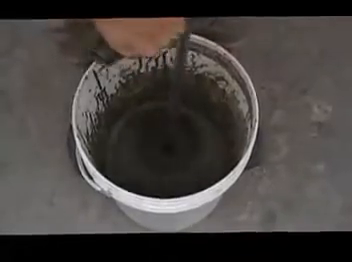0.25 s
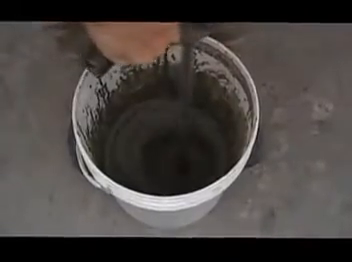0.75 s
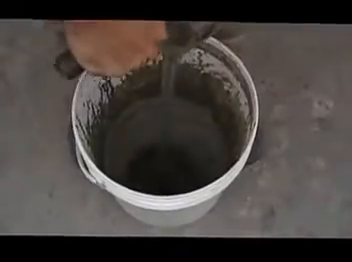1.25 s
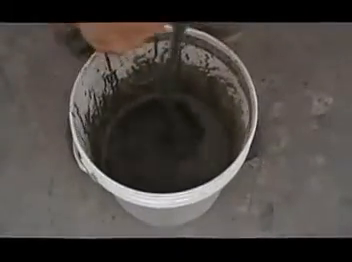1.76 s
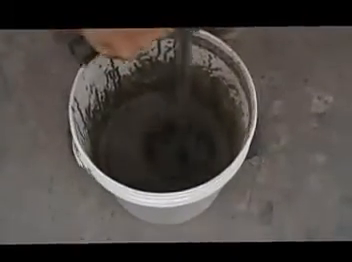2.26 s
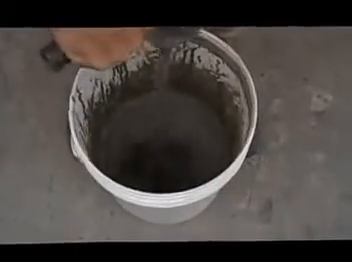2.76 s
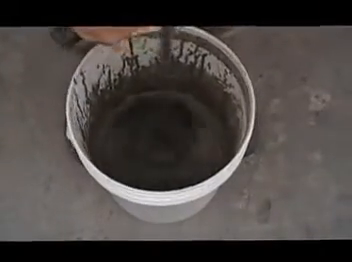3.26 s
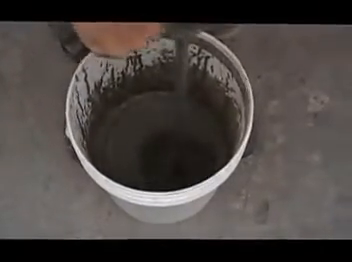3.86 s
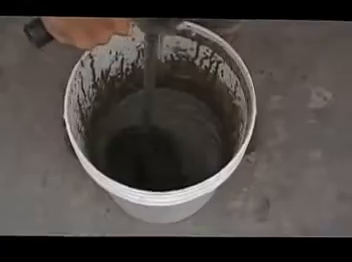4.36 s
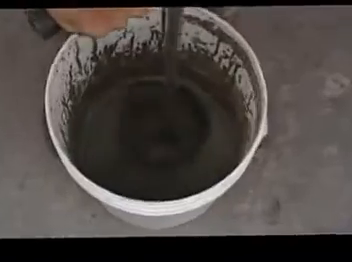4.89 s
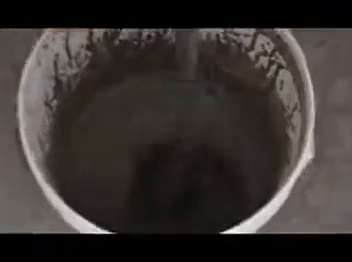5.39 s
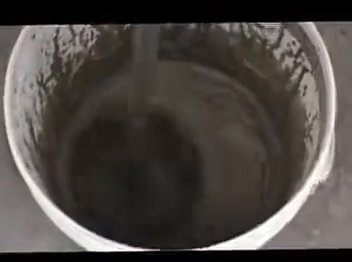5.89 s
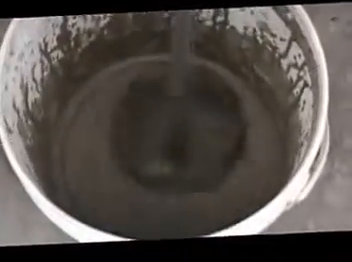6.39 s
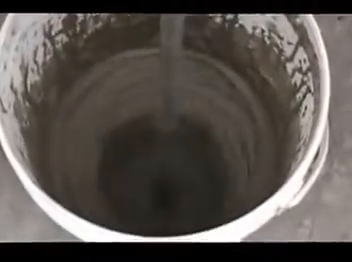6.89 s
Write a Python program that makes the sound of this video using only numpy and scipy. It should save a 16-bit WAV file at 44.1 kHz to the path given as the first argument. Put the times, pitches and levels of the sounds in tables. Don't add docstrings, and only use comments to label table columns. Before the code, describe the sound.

Steady hissing drill whine over thick mortar churning in a plastic bucket, the paddle thudding against the wall in clusters; still running at the end.

```python
import sys
import numpy as np
from scipy import signal
from scipy.fft import rfft, irfft
from scipy.io import wavfile
from scipy.ndimage import uniform_filter1d

SR = 44100
rng = np.random.default_rng(int(sys.argv[2]) if len(sys.argv) > 2 else 0)


def output_pcm(signal):
    pcm = np.clip(np.atleast_2d(signal).T, -1, 1) * 32767
    wavfile.write(sys.argv[1], SR, np.round(pcm).astype(np.int16))


def field_ratio(decibels):
    return 10 ** (np.asarray(decibels, dtype=float) / 20)


N = 314874
T, FRAMES, BINS = np.arange(N) / SR, N // 128 + 5, np.fft.rfftfreq(512, 1 / SR)
FRAME_T = np.arange(FRAMES) * 128 / SR
TRIGGER_S, FULL_SPEED_HZ = .187, 1640
LAYSHAFT, PADDLE = 0.0408, 0.0162


def evened(x):
    return x / np.sqrt(np.mean(x ** 2) + 1e-20)


def read(points, hz):
    f, value = np.transpose(points)
    return np.interp(np.log(hz + 1), np.log(f + 1), value)


def columns(rows, t):
    s, *rest = np.transpose(rows)
    return [np.interp(t, s, c) for c in rest]


def bumps(rows, column):
    return sum(row[column] * np.exp(-((FRAME_T - row[0]) / row[1]) ** 2) for row in rows)


def fine(control):
    return np.interp(T, FRAME_T, control)


def drift(hz):
    r = np.exp(-np.pi * abs(hz) / SR)
    z = rng.standard_normal((N, 2)) @ [1, 1j]
    for _ in range(2):
        z = signal.lfilter([1 - r], [1, -r], z)
    return z / np.sqrt(np.mean(abs(z) ** 2))


def tone(turns, steady, flutter, blur_hz):
    height = steady + flutter * drift(blur_hz)
    return np.sqrt(2) * (height * np.exp(2j * np.pi * turns)).real


# pitch_hz, likeness (0 to 1)
CAPSULE_LIKENESS = [(60, .3), (130, .99), (290, .9), (640, .87), (1410, .95), (2500, .88), (4500, .94),
                    (6500, .955), (9000, .76), (11500, .68), (13500, .35)]


def noise(shape_db, patchy_db):
    a, b, c, d, patches = rng.standard_normal((FRAMES, 257, 5)).T
    patches = uniform_filter1d(patches, size=8, axis=0)
    patches = evened(uniform_filter1d(patches, size=20, axis=1))
    same = np.clip(read(CAPSULE_LIKENESS, BINS), 0, 1)[:, None]
    mid = a + 1j * b
    odd = np.sqrt((1 - same) / (1 + same)) * (c + 1j * d)
    gain = field_ratio(shape_db + patchy_db * patches)
    gain = gain / np.sqrt((gain ** 2).mean(0))
    out = signal.istft(np.array([mid + odd, mid - odd]) * gain, nperseg=512, noverlap=384)[1][:, :N]
    return out / np.sqrt(np.mean(out.mean(0) ** 2))


# time_s, tone_unit_hz (a third of the armature slot rate)
CRUISING_SPEED = [(.19, 1548), (.28, 1570), (.38, 1540), (.65, 1536), (1.0, 1556), (1.74, 1587),
                  (1.9, 1613), (2.3, 1620), (2.75, 1608), (3.2, 1621), (3.36, 1632), (4.0, 1624),
                  (4.5, 1634), (5.1, 1652), (5.5, 1640), (6.3, 1646), (6.55, 1656), (6.85, 1660)]
# time_s, half_width_s, speed_lost_hz
BOGS = [
    (4.6, .08, 14),
    (4.75, .05, 5),
    (6.1, .085, 15),
    (6.44, .05, 9),
    (7.16, .14, 9),
]


def motor_speed():
    start_hz, coast_decay_s, spin_up_s = 860.5, .73, .22
    coast = start_hz * np.exp(-np.minimum(FRAME_T, TRIGGER_S) / coast_decay_s)
    lag = np.exp(-np.maximum(FRAME_T - TRIGGER_S, 0) / spin_up_s)
    driven = columns(CRUISING_SPEED, FRAME_T)[0] - (CRUISING_SPEED[0][1] - coast) * lag
    return np.where(FRAME_T < TRIGGER_S, coast, driven) - bumps(BOGS, column=2)


def speed_share(turns):
    return np.gradient(turns) * SR / FULL_SPEED_HZ


def snags():
    brake = 0
    for s, db, hz in KNOCKS:
        after = np.maximum(FRAME_T - s, 0)
        grab = (1 - np.exp(-after / 0.0035)) * np.exp(-after / 0.055)
        brake = brake + field_ratio(1.3 * (db + 21.0)) * grab
    return .0045 * fine(brake - uniform_filter1d(brake, size=70))


def nearness():
    start_s, rise_s = 4.65, 0.9
    return np.clip((FRAME_T - start_s) / rise_s, 0, 1)


WALL_PASSES = [-1.4, .1, 1.64, 3.08, 4.55, 6.1, 7.7]


def lap(share):
    laps = np.interp(FRAME_T, WALL_PASSES, np.arange(len(WALL_PASSES)))
    return np.cos(2 * np.pi * (laps - share))


# time_s, hiss_change_db
VENT_JOLTS = [(1.63, -4), (2.9, -3), (4.1, 3), (4.34, -2), (4.41, 5), (4.45, -6), (4.53, 2.5), (4.69, -8),
              (5.97, 1.5), (6.01, -5), (6.12, -2.5), (6.18, -2.5), (6.44, -1)]
# time_s, half_width_s, churn_db
SLACKS = [(.17, .035, -2), (.5, .2, -5), (.776, .035, -9), (1.16, 0.036, -1), (2.0, 0.037, -6),
          (2.52, 0.036, 0), (3.06, 0.026, -5), (3.61, 0.018, -6), (3.71, 0.023, -7), (4.47, .03, -6),
          (4.6, 0.035, -3), (4.96, .05, -7), (5.865, 0.018, -2), (6.054, .035, 0), (6.173, 0.018, -6),
          (7.1, .4, -5)]


def loads():
    near, run_db = nearness(), 20 * np.log10(motor_speed() / FULL_SPEED_HZ)
    jolt_s, splash_s, splash_gain_db = 0.0066, 0.016, 1
    jolt_db = bumps([(s, jolt_s, db) for s, db in VENT_JOLTS], column=2)
    splashes = [(s, splash_s, splash_gain_db * field_ratio(db + 19.5)) for s, db, hz in KNOCKS]
    start_db = -7 * np.exp(-FRAME_T / 0.14)
    hiss_db = -16.33 + 0.84 * near + jolt_db
    growl_db = -26.62 - near + start_db
    churn_db = -41.5 + 5.5 * lap(0.0094) * (1 - .5 * near)
    churn_db += 1.2 * near * (FRAME_T < WALL_PASSES[-2]) + 3.04 * run_db
    churn_db += bumps(splashes, column=2) + bumps(SLACKS, column=2) - 2.4 * start_db
    return fine(hiss_db), fine(growl_db), fine(churn_db)


# time_s, half_width_s, level_db
BITES = [(1.056, 0.035, 4.0), (1.505, 0.04, 3), (1.547, 0.012, 5.5), (1.703, 0.023, 8), (1.785, 0.02, 8),
         (2.097, 0.03, 2), (2.348, 0.04, 3.5), (2.716, 0.03, 2.5), (2.936, 0.023, 5), (3.167, 0.027, 5),
         (3.244, 0.028, 5.0), (3.34, 0.019, 8), (3.441, 0.035, 7), (3.639, 0.026, 6.0), (3.966, 0.04, 2),
         (4.187, 0.04, 3), (4.486, 0.04, 3.5), (4.589, 0.018, 5.0), (4.736, 0.034, 6), (4.891, 0.035, 4),
         (5.17, 0.022, 4), (5.432, 0.03, 4), (6.056, 0.023, 4), (6.218, 0.04, 4.0), (6.667, 0.04, 4.0),
         (6.931, 0.033, 5.0), (7.067, 0.017, 2)]
# time_s, level_db
SKIPS = [(1.417, -2), (1.582, -6), (1.675, -3), (1.739, -11), (1.814, -9), (2.187, -7), (2.877, -3),
         (3.104, -2), (3.195, -7), (3.277, -10), (3.889, -7), (4.294, -7), (4.691, -11), (6.084, -7),
         (6.744, -5)]


def bites():
    skip_s = 0.011
    return bumps(BITES, column=2) + bumps([(s, skip_s, db) for s, db in SKIPS], column=2)


def scrape():
    centre_hz, half_width_hz = 1700, 129
    return np.outer(np.exp(-((BINS - centre_hz) / half_width_hz) ** 2), 0.55 * bites())


# pitch_hz, level_db (per Hz)
HISS_COASTING = [(800, -70), (1200, -19), (1550, -4), (2310, -7.5), (2800, -3.5), (3400, -13), (4020, -13),
                 (5000, -7), (6040, -1.5), (7570, -4), (8350, 3.5), (9200, -3.5), (12000, -19.5),
                 (16000, -50)]
# pitch_hz, level_db (per Hz)
HISS_AT_SPEED = [(800, -32.5), (1200, -18), (1350, -11), (1730, -5), (2100, -9), (3180, -6.5), (4000, -7),
                 (6040, -3), (8150, -2.5), (9470, -3), (10500, -8), (12500, -21), (14000, -26),
                 (16000, -66)]
# pitch_hz, half_width_hz, level_db
HOUSING = [(2780, 140, 1.5), (3410, 91, -4), (4060, 200, 2.5), (6100, 200, 1.5), (7800, 100, 2.5),
           (8360, 120, 3.5), (10440, 170, -3), (10520, 60, 0.5)]


def hiss(turns, level_db):
    fast = np.clip((motor_speed() - 850) / 650 + 0.4 * (FRAME_T > TRIGGER_S), 0, 1)
    colour_db = np.outer(read(HISS_COASTING, BINS), 1 - fast) + np.outer(read(HISS_AT_SPEED, BINS), fast)
    ring_db = sum(db * np.exp(-((BINS - hz) / width) ** 2) for hz, width, db in HOUSING)
    colour_db += np.outer(ring_db, fast) + scrape()
    air = np.clip((BINS - 11000) / 3000, 0, 1)
    colour_db += np.outer(air, 5.5 * np.interp(FRAME_T, T, drift(hz=25).real))
    gusts_db = 0.098 * drift(hz=20.8).real + 1.07 * drift(hz=91.0).real
    gusts_db += 0.75 * np.cos(2 * np.pi * LAYSHAFT * turns)
    return field_ratio(level_db + gusts_db) * noise(colour_db, patchy_db=0.5)


# pitch_hz, level_db (per Hz)
GROWL_FAR = [(220, -32), (380, -3), (447, -28.5), (561, -3.5), (699, -5), (1120, 4), (1470, -7), (1710, -1),
             (2200, -2), (2860, -14.5), (4840, -120)]
# pitch_hz, level_db (per Hz)
GROWL_NEAR = [(220, -40), (380, -21.5), (467, -15.5), (704, -9.5), (816, 0.5), (1320, -7.5), (1730, -3),
              (2040, -21), (2200, -19), (2860, -26), (4840, -120)]


def growl(turns, level_db):
    near = nearness()
    colour_db = np.outer(read(GROWL_FAR, BINS), 1 - near) + np.outer(read(GROWL_NEAR, BINS), near) + scrape()
    throb_db = 0.17 * drift(hz=37).real + 0.32 * np.cos(2 * np.pi * LAYSHAFT * turns)
    return field_ratio(level_db + throb_db) * noise(colour_db, patchy_db=1.06)


# pitch_hz, level_db (per Hz)
CHURN_COLOUR = [(12, -72), (20, -42), (75, -41), (101, -26), (189, -26), (216, -5), (255, -2.5), (274, 16),
                (468, -26), (528, -1), (700, -4), (910, -25), (1540, -120)]


def churn(turns, level_db):
    slap_db = 1.5 * np.cos(2 * np.pi * PADDLE * turns) + 2.5 * drift(hz=30).real
    wash = noise(read(CHURN_COLOUR, BINS)[:, None], patchy_db=1.0)
    thin = signal.butter(3, 150, "high", fs=SR, output="sos")
    return field_ratio(level_db - 0.5 + slap_db) * signal.sosfilt(thin, wash)


def wall_note(level_db):
    return field_ratio(level_db - 5) * tone(264 * T, steady=0, flutter=0.96, blur_hz=45)


# pitch_hz, level_db
SLOT = [(2000, -48), (3300, -33), (3550, -31), (3750, -25), (3900, -29), (4100, -23), (4260, -29),
        (4440, -30), (4570, -24), (4700, -27)]
# pitch_hz, level_db
SLOT_OCTAVE = [(3900, -42), (4300, -40), (4600, -45), (5100, -35), (5400, -41), (7600, -24), (8400, -21),
               (8600, -28), (8750, -19), (8950, -35), (9150, -19), (9400, -25)]
# time_s, half_width_s, slot_db, slot_octave_db, mesh_octave_db
TILTS = [(.6, .02, -12, 3, 0), (.67, .04, -3, 1, 4), (.77, .03, -14, 0, -5), (.89, .05, 2.5, 2, -5),
         (1.07, 0.034, 3.5, 2, 0), (1.7, .07, 3.5, -4, -2), (2.36, 0.065, -2, -1, 6),
         (3.12, 0.022, -0.5, -6, -4), (3.81, .025, 0, -4, 0), (4.62, 0.081, 1, 1, 2),
         (5.29, 0.045, 3, -4, -2), (5.9, .04, 1.5, 2, 9), (6.36, 0.043, 1, 0, 7), (7.14, .04, 2, -8, 2),
         (.99, 0.033, -16, 0.5, -10), (1.3, 0.34, -0.5, 0.5, 2), (4.511, 0.0066, -14, -6, 0),
         (6.03, 0.066, -7, 6, -6), (6.22, 0.047, -5, 6, 0), (2.2, .45, 0.5, 2.5, -16),
         (2.62, 0.065, 2.5, 1, -9), (2.92, 0.16, 0.5, 6.5, -12), (3.32, 0.14, -0.5, 3.5, 0),
         (3.55, 0.36, -0.5, 3, 3), (4.16, 0.091, 2, 3, 3), (4.46, 0.18, -1, 6, -1),
         (4.79, 0.054, -7, 0, -6), (4.95, 0.12, 0, 6.5, 4), (5.52, 0.22, -7, 0, 0), (5.75, 0.17, 0, 4.5, 0),
         (6.16, 0.11, -3, -3, -11), (6.4, 0.1, 0, -4, -1), (6.7, .1, -3, -4, 4), (7.0, 0.15, -2.5, 1.5, 4)]
# time_s, half_width_s, level_db
JERKS = [(3.935, .008, -9), (5.14, .005, -5), (5.265, .01, -6), (5.346, .014, -8), (5.376, .006, -5),
         (5.917, .007, -6), (5.97, 0.027, 3), (6.007, 0.0074, -9), (6.021, .005, 10), (6.12, .045, 1),
         (6.887, .015, -4)]


def armature(turns):
    unit_hz = motor_speed()
    slot_db = read(SLOT, 3 * unit_hz) + 8 * np.clip((unit_hz - 1570) / 35, 0, 1)
    slot_db = fine(slot_db + bumps(TILTS, column=2) + bumps(JERKS, column=2))
    unpowered_db = 6 * (FRAME_T < TRIGGER_S)
    octave_db = fine(read(SLOT_OCTAVE, 6 * unit_hz) + bumps(TILTS, column=3) + unpowered_db)
    settled = np.clip(T - 3.5, 0, 1)
    third_db = -50.5 + 3 * settled + 200 * np.log10(speed_share(turns)) + 5.5 * drift(hz=14).real
    out = field_ratio(slot_db) * tone(3 * turns, steady=.97, flutter=.16, blur_hz=45)
    out += field_ratio(octave_db) * tone(6 * turns, steady=0.88, flutter=0.28, blur_hz=60)
    return out + field_ratio(third_db) * tone(9 * turns, steady=0.8, flutter=.3, blur_hz=60)


def layshaft_wobble(turns):
    return 1 + 0.47 * speed_share(turns) ** 4 * np.cos(2 * np.pi * (LAYSHAFT * turns + 0.25))


# pitch_hz, level_db
MESH_ONE = [(1330, -49), (1450, -23.5), (1720, -21.5), (2260, -22.5), (2550, -19.5), (2930, -25.5),
            (3110, -35), (3190, -44.5)]
# pitch_hz, level_db
MESH_OCTAVE = [(2660, -20), (2930, -25), (3150, -39), (3500, -40), (4620, -38), (4800, -21), (5000, -29),
               (5250, -26), (5400, -35), (5650, -32), (5830, -24), (6100, -31)]
# time_s, half_width_s, mesh_db
FLARES = [(.17, 0.055, -14), (.26, .04, 1), (.8, 0.046, 3), (1.15, .12, 4.5), (1.85, 0.091, -3),
          (2.13, 0.21, 16.5), (3.2, 0.092, 7), (3.6, 0.36, 14.5), (4.65, 0.22, 8), (4.8, .04, 3),
          (4.97, .03, 8), (5.12, 0.29, 16), (5.05, .025, -1), (5.2, .025, -1), (6.18, 0.007, 22),
          (6.25, 0.013, 6), (6.5, 0.35, 10)]
# time_s, peak_db
TOOTH_SLAPS = [(0.1894, 2), (1.07, -4), (1.13, -8), (1.27, -5), (1.3344, -6), (1.3514, 0), (1.4141, 4),
               (1.4887, 12.5), (1.5113, -1), (1.53, -2), (1.553, -2), (1.5814, 11), (1.6135, 7),
               (1.6494, 6), (1.692, 12), (1.7054, -8), (1.7354, 13), (1.7614, 0), (1.778, -2),
               (3.0194, 11.5), (3.0498, 0), (3.195, -7), (4.523, 4), (4.559, 13), (4.5776, 6), (4.6114, -7),
               (4.6324, 1), (4.714, -2), (5.9984, 6), (6.1794, -2.5), (6.494, -17), (6.5281, 7),
               (6.6405, 11)]


def first_gear_pair(turns):
    unit_hz, wobble = motor_speed(), layshaft_wobble(turns)
    loaded = fine(np.clip((unit_hz - 1540) / 60, 0, 1))
    mesh_db = fine(read(MESH_ONE, 2 * unit_hz) + bumps(FLARES, column=2))
    octave_db = fine(read(MESH_OCTAVE, 4 * unit_hz) + bumps(TILTS, column=4) + 3 * nearness())
    octave_db += 10 * np.clip((.14 - T) / .06, 0, 1)
    slaps = fine(bumps([(s + .004, 0.0029, field_ratio(db - 21.0)) for s, db in TOOTH_SLAPS], column=2))
    mesh = tone(2 * turns, steady=.85, flutter=.25 + .4 * loaded, blur_hz=60)
    octave = tone(4 * turns, steady=.88, flutter=.2 + .3 * loaded, blur_hz=90)
    out = (field_ratio(mesh_db) * wobble + .12 * slaps) * mesh
    out += field_ratio(octave_db - 1.5) * wobble * octave
    return out + slaps * tone(4 * turns, steady=.6, flutter=.6, blur_hz=350)


# pitch_hz, level_db
MESH_TWO = [(900, -45), (1340, -42), (1400, -30), (1500, -41.5), (1540, -35), (1630, -32), (1700, -37),
            (1730, -34)]
# time_s, half_width_s, second_mesh_db, case_hum_db
LEANS = [(.58, 0.034, 11, -6), (1.0, 0.15, 2, 3), (1.15, 0.071, -2, 3), (1.47, .07, -4, 6),
         (1.95, 0.17, -6, -5), (2.37, 0.055, -1.5, 0), (3.3, 0.21, 1, 4), (3.8, 0.19, -2.5, 0),
         (4.3, 0.22, -2.5, 0), (5.45, 0.13, 0, 6), (5.82, 0.067, 1, 0), (5.98, 0.077, 1, -2),
         (6.12, 0.052, -11, -4), (6.23, 0.043, 1, 5), (6.4, .08, 5.5, 5), (1.5, .07, 5, 4),
         (1.71, 0.027, 1, -4), (1.79, 0.025, 5, 0), (2.6, .25, 1.5, 5), (7.0, 0.2, -6.5, 0)]


def second_gear_pair(turns):
    unit_hz = motor_speed()
    loaded = np.clip((unit_hz - 1540) / 60, 0, 1)
    level_db = 2.5 + read(MESH_TWO, 1.065 * unit_hz) + 3 * loaded * lap(.65) - 1.2 * nearness()
    level_db = fine(level_db + bumps(LEANS, column=2) + 0.9 * bites())
    return field_ratio(level_db) * layshaft_wobble(turns) * tone(1.065 * turns, steady=.97, flutter=.15, blur_hz=30)


# multiple (of the tone unit), level_db, blur_hz
WEAK_WHINES = [(.75, -61, 15), (1.422, -41.5, 47), (1.644, -43, 20), (2.355, -39, 62), (4.5, -76, 20),
               (6.5, -72, 20)]


def weak_whines(turns):
    whines = sum(field_ratio(db) * tone(k * turns, 0.45, 0.71, blur_hz) for k, db, blur_hz in WEAK_WHINES)
    return speed_share(turns) * whines


# pitch_hz, level_db
CASE_UPPER = [(600, -60), (907, -48), (1077, -40), (1123, -40), (1150, -44), (1175, -48)]


def case(turns):
    unit_hz = motor_speed()
    upper_db = fine(read(CASE_UPPER, .711 * unit_hz) + bumps(LEANS, column=3))
    lower_db = fine(-47.5 + 36 * np.log10(unit_hz / FULL_SPEED_HZ) + 12 * np.minimum(nearness(), .6))
    upper = field_ratio(upper_db) * tone(.711 * turns, steady=.92, flutter=.25, blur_hz=25)
    return upper + field_ratio(lower_db) * tone(.5 * turns, steady=.85, flutter=.45, blur_hz=30)


# time_s, pitch_hz, level_db
SQUEAL = [(0, 11600, -40), (.2, 11550, -37), (.55, 11900, -37), (1.5, 12000, -37), (3, 12020, -39),
          (7.14, 12030, -41)]


def bearing():
    hz, db = columns(SQUEAL, T)
    return field_ratio(db) * tone(np.cumsum(hz) / SR, steady=.1, flutter=1.0, blur_hz=160)


# time_s, peak_db, bucket_ring_hz
KNOCKS = [(.09, -30, 270), (.268, -35, 350), (.715, -28, 300), (1.105, -33, 433), (1.346, -28, 315),
          (1.437, -26, 302), (1.543, -21.5, 257), (1.618, -20.5, 287), (1.657, -24.5, 277),
          (1.71, -23.5, 199), (1.821, -30, 286), (1.95, -35, 272), (2.457, -31, 272), (2.576, -28, 273),
          (2.631, -25, 285), (2.689, -34, 272), (2.779, -31, 278), (2.85, -22.5, 280), (2.93, -27, 254),
          (3.099, -32, 277), (3.152, -28, 307), (3.175, -24, 239), (3.357, -27.5, 350), (3.396, -22.5, 280),
          (3.532, -28, 343), (3.626, -28, 330), (3.733, -27, 260), (4.042, -28, 267), (4.245, -34, 270),
          (4.326, -28, 287), (4.356, -30, 271), (4.397, -29, 285), (4.418, -27, 260), (4.515, -23, 310),
          (4.45, -31, 280), (4.66, -23.5, 281), (4.682, -34, 263), (4.717, -36, 260), (4.755, -27, 260),
          (4.843, -24.5, 255), (5.105, -33, 270), (5.176, -28, 275), (5.397, -29, 270), (5.674, -33, 300),
          (5.78, -27, 257), (5.821, -27, 248), (5.898, -23, 288), (5.929, -28, 279.6), (5.991, -19, 256),
          (6.119, -21, 266), (6.212, -23, 263), (6.246, -27, 273.8), (6.279, -30, 253.4), (6.345, -25, 308),
          (6.39, -27, 312.3)]


def knocks():
    out, t = np.zeros(N + 3000), np.arange(3000) / SR
    thud = signal.sosfilt(signal.butter(2, [205, 800], "band", fs=SR, output="sos"), np.exp(-t / 0.000083))
    thud = thud / abs(thud).max()
    envelope = (1 - np.exp(-t / 0.0025)) * field_ratio(-60 * t / 0.075)
    for s, db, hz in KNOCKS:
        ring = np.sin(2 * np.pi * hz * t) * envelope
        out[round((s + .002) * SR):][:3000] += field_ratio(db - .5) * (ring + 1.4 * thud)
    return out[:N]


# time_s, half_width_s, level_db
SLAB_PRESSES = [
    (.1, .08, 13),
    (1.25, .3, 7),
    (2.4, 0.17, 11),
    (3.1, .2, 7),
    (3.88, 0.14, 12),
    (4.33, .1, 17),
    (5.4, 0.22, 14.5),
    (5.95, 0.17, 6),
    (6.75, .1, 17),
]


def floor_hum():
    level_db = -69.5 + fine(bumps(SLAB_PRESSES, column=2))
    return field_ratio(level_db) * tone(109 * T, steady=0.67, flutter=0.47, blur_hz=9.1)


def lumps():
    per_s, base_db = 8, -33
    draw, size = rng.random(N), np.minimum(rng.exponential(1, N), 3)
    wall = signal.butter(2, [450, 1100], "band", fs=SR, output="sos")
    tick = signal.sosfilt(wall, np.exp(-np.arange(600) / 6))
    level_db = base_db + 3 * size + 4 * fine(lap(0)) - 12 * (T < .9)
    hits = (draw < per_s / SR) * field_ratio(level_db)
    return signal.oaconvolve(hits, tick / abs(tick).max())[:N]


# time_s, peak_db, wall_hz
GRIT_TICKS = [(1.044, -19.5, 647), (1.107, -22, 786), (1.227, -20, 880), (1.346, -21, 720),
              (1.481, -15.5, 884), (1.54, -26, 861), (1.708, -23, 567), (1.784, -21, 890),
              (2.351, -26, 538), (2.741, -36, 835), (2.997, -20, 821), (3.723, -27, 813), (3.834, -22, 633),
              (4.023, -19, 649), (4.128, -26, 640), (4.326, -23, 810), (4.517, -23, 888), (5.552, -26, 783),
              (5.897, -22, 818), (6.109, -17, 846), (6.547, -23, 810), (6.797, -26, 869)]


def ticks():
    out, t = np.zeros(N + 900), np.arange(900) / SR
    attack = 1 - np.exp(-t / 0.00053)
    for s, db, hz in GRIT_TICKS:
        fade = field_ratio(db - 4.5 - 60 * t / 0.032)
        out[round(s * SR):][:900] += 2.1 * fade * attack * np.sin(2 * np.pi * hz * t)
    return out[:N]


def scene():
    hiss_db, growl_db, churn_db = loads()
    shaft_hz, drag_s = 12.8, 3.105
    rod_drag = np.cos(2 * np.pi * shaft_hz * (T - drag_s))
    shiver = .0018 * field_ratio(.6 * (churn_db + 33)) * (.7 * drift(hz=45).real - 1.2 * rod_drag)
    turns = np.cumsum(fine(motor_speed()) * (1 + shiver - snags())) / SR
    wash = hiss(turns, hiss_db) + growl(turns, growl_db) + churn(turns, churn_db)
    surge = field_ratio(.75 * drift(hz=14).real)
    whine = armature(turns) + first_gear_pair(turns) + second_gear_pair(turns) + weak_whines(turns)
    hums = case(turns) + bearing() + floor_hum() + wall_note(churn_db)
    return surge * wash + whine + hums + knocks() + lumps() + ticks()


# pitch_hz, left_minus_right_db
CAPSULE_LEAN = [(30, -1), (90, -4), (290, -4.5), (640, -3.5), (1410, -2.3), (3100, -.4), (6000, -.5),
                (9000, -2.9), (12000, -.4)]


def low_pass(x):
    return signal.sosfilt(signal.butter(12, 15180, fs=SR, output="sos"), x)


def record(dry):
    hz = np.fft.rfftfreq(N, 1 / SR)
    lean_db = np.outer([.5, -.5], read(CAPSULE_LEAN, hz))
    cut = (hz / 98) ** 6 / (1 + (hz / 98) ** 6) + 0.049
    squeezed = .85 * np.tanh(dry / .85)
    rumble = field_ratio(-52) * rfft(rng.standard_normal((2, N))) / (1 + (hz / 65) ** 2)
    mix = irfft(rfft(squeezed) * field_ratio(lean_db) * cut + rumble, N)
    return low_pass(mix)


dry = scene()
out = record(dry)
output_pcm(out)
```